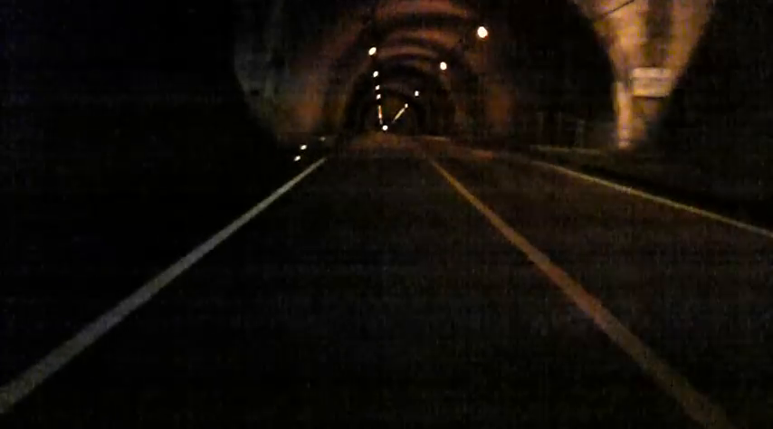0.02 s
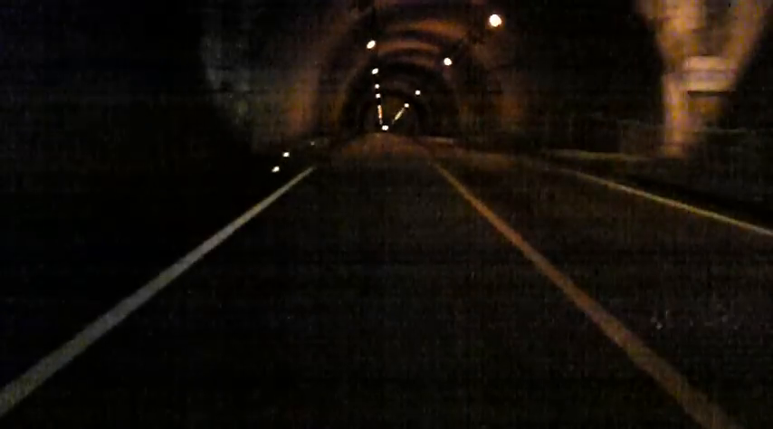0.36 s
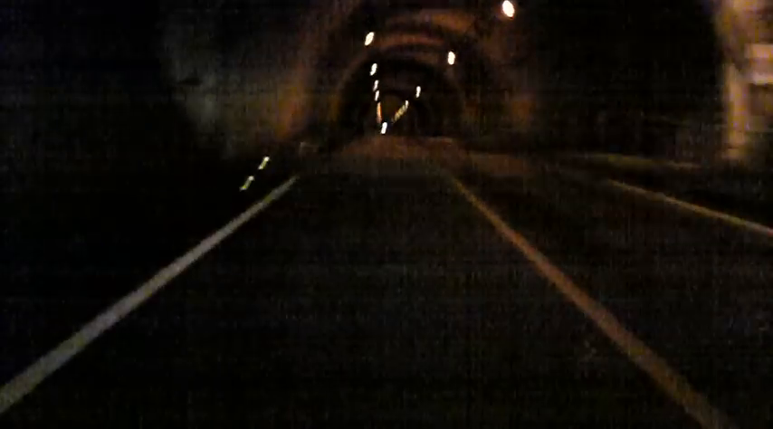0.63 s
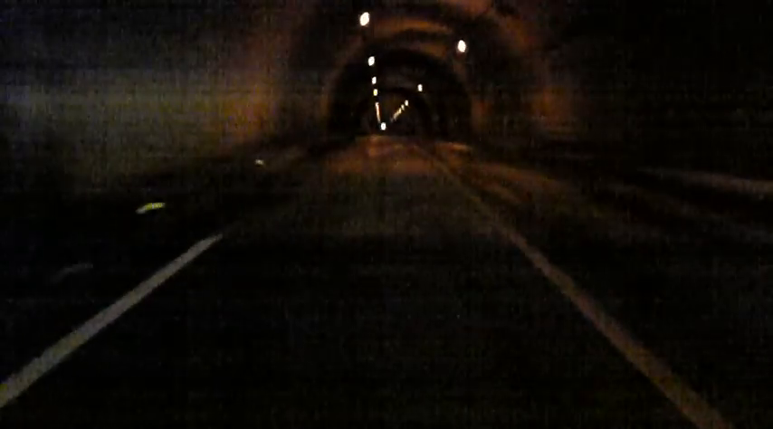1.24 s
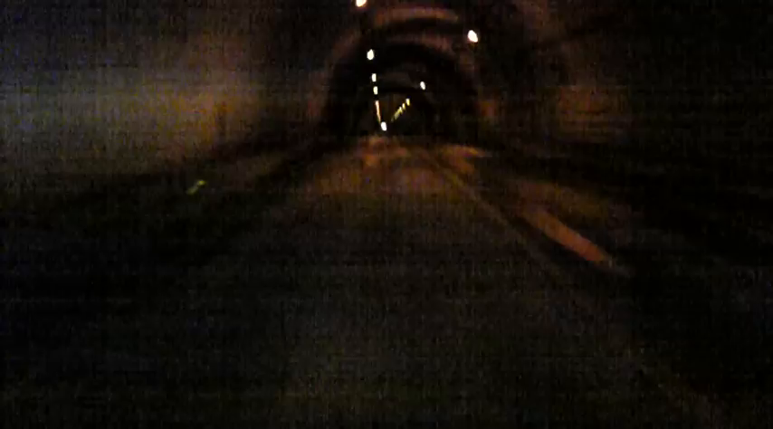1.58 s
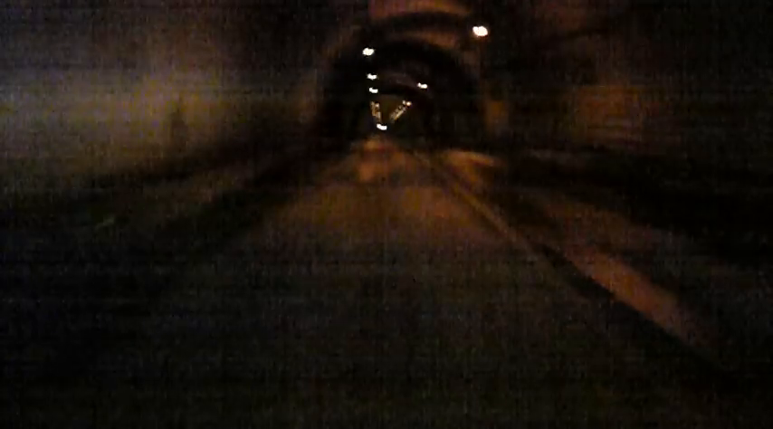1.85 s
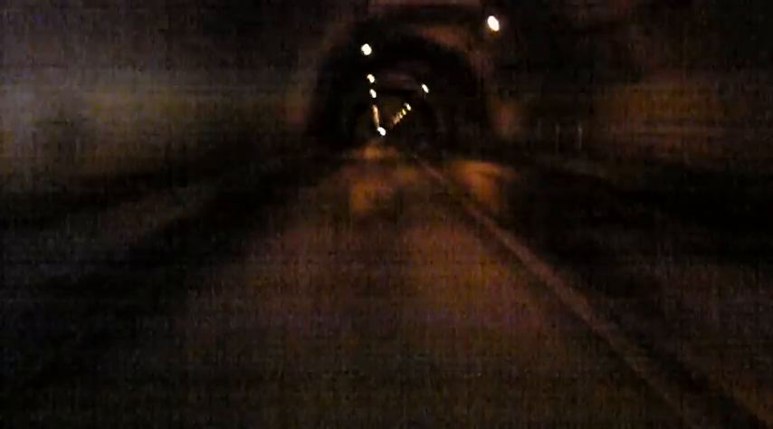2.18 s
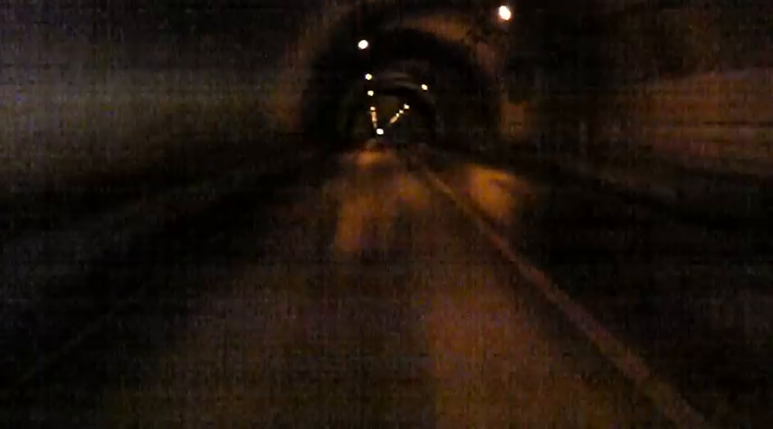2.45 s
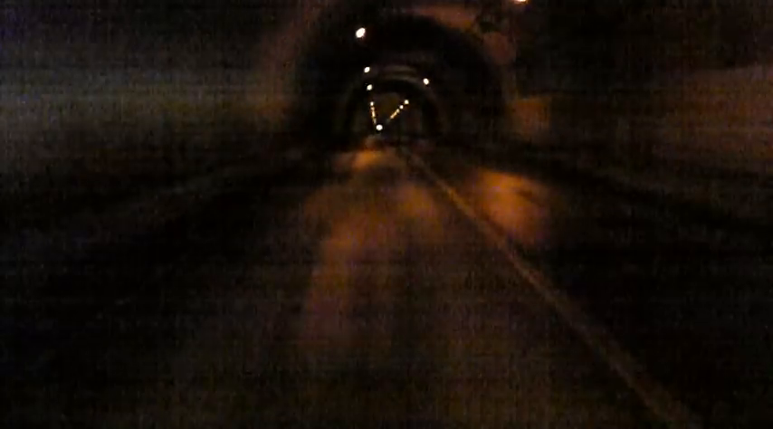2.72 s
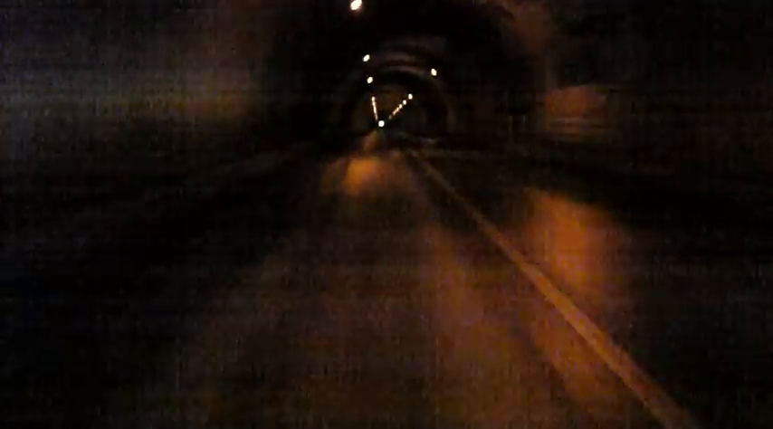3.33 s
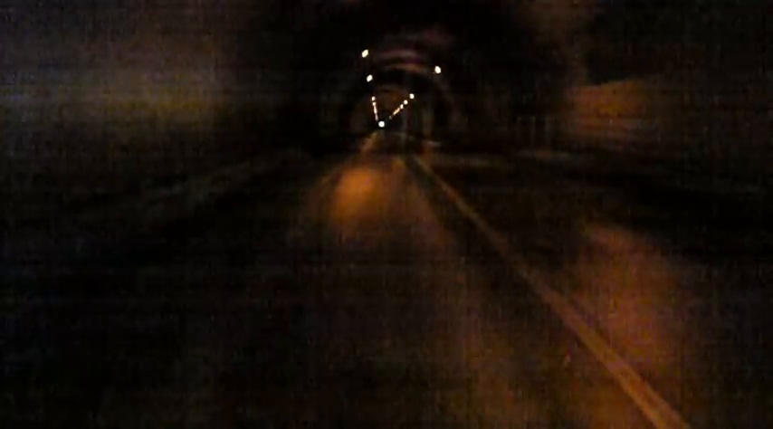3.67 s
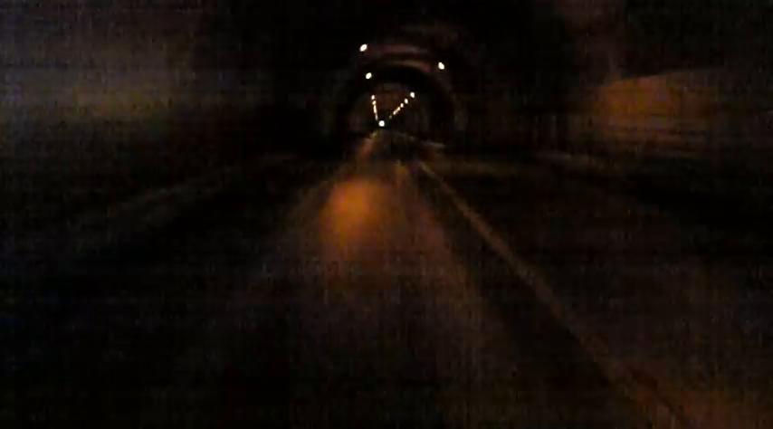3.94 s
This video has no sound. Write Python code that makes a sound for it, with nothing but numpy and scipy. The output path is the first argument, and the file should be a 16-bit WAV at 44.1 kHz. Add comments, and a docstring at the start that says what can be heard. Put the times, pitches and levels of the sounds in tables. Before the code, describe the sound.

A loud train-style air horn holds one note as a car drives into a tunnel.

```python
"""A train-style air horn on a car holds one note as the car drives into a road tunnel.
Engine and tyre drone come first; compressed air rushes out, a shrill edge-tone whistle speaks, and
the horn's diaphragm joins in and sounds to the end. Inside, the tunnel roars and wall reflections
make the partials swell, fade and beat. A narrow-band recorder with gain control ducks the road
under the horn. Faint, very short high ticks sound at set times."""
import sys
import numpy as np
from scipy import signal
from scipy.fft import rfft, irfft
from scipy.io import wavfile
from scipy.ndimage import uniform_filter1d, minimum_filter1d

SR = 44100
rng = np.random.default_rng(int(sys.argv[2]) if len(sys.argv) > 2 else 0)


def store_pcm(level_fs):
    """Save levels as 16-bit WAV."""
    pcm = np.round(np.clip(level_fs, -1, 1) * 32767).astype(np.int16)
    wavfile.write(sys.argv[1], SR, np.atleast_2d(pcm).T)


N = 176400
T = np.arange(N) / SR
HORN_HZ = 310.6


def amp(db):
    """Decibels to gain."""
    return 10 ** (np.asarray(db) / 20)


def unit(x):
    """Scales to rms 1."""
    return x / np.sqrt(np.mean(abs(x) ** 2) + 1e-20)


def curve(rows, column=1):
    """An automation curve: one column of a time table, at every sample."""
    rows = np.array(rows)
    return np.interp(T, rows[:, 0], rows[:, column])


def noise(spectrum):
    """Noise of rms 1, coloured by rows of f/Hz, level/dB."""
    hz, db = np.transpose(spectrum)
    f = np.fft.rfftfreq(N, 1 / SR)
    colour = amp(np.interp(np.log(f + 1), np.log(hz), db))
    return unit(irfft(rfft(rng.standard_normal(N)) * colour, N))


def flutter(width_hz, order=4):
    """Complex random modulation of rms 1, up to about the given rate."""
    f = np.fft.fftfreq(N // 20, 20 / SR)
    phases = np.exp(2j * np.pi * rng.random(len(f)))
    motion = np.fft.ifft(phases / np.sqrt(1 + abs(f / width_hz) ** order))
    return unit(np.interp(T, T[::20], motion))


def tone(hz):
    """A complex oscillator that follows a pitch curve; its real part has rms 1."""
    return np.sqrt(2) * np.exp(2j * np.pi * (np.cumsum(hz * np.ones(N)) / SR + rng.random()))


def low_pass(x, hz):
    """Steep low-pass."""
    return signal.fftconvolve(x, signal.firwin(401, hz, window=("kaiser", 10), fs=SR), "same")


def road():
    """Wavering engine and tyre tones in a bed of flickering road noise."""
    # engine and tyre tones: f/Hz, level/dB
    drone_tones = [(152, -16), (204, -10.5), (255, -13.5), (305, -6), (348, -1), (382, -12), (533, -18),
                   (636, -18.5), (687, -16)]
    # road noise spectrum: f/Hz, level/dB
    road_colour = [(20, -42), (60, -26), (120, -17), (210, -3), (360, 3), (480, -10.5), (800, -12.5),
                   (1200, -19.5), (2000, -25), (2800, -29), (3200, -27), (3500, -42), (4000, -54.5)]
    # fader for both, with an abrupt drop at 0.5 s: t/s, level/dB
    road_fader = [(0, -43), (.06, -35), (.22, -24.5), (.497, -20.5), (.503, -42), (.53, -32), (.68, -32.5),
                  (1, -42), (4, -42.5)]
    drone = sum(amp(db) * (tone(hz) * (1 + .5 * flutter(width_hz=9))).real for hz, db in drone_tones)
    flicker = amp(1.4 * flutter(width_hz=25).real)
    bed = flicker * noise(road_colour)
    return (amp(-3.5) * drone + amp(-4.5) * bed) * amp(curve(road_fader))


def tunnel_roar():
    """The low roar that the tunnel walls return, building as the car goes in."""
    # roar spectrum: f/Hz, level/dB
    roar_colour = [(20, -20), (65, 0), (130, -1.5), (300, 5), (600, 2.5), (780, -8.5), (1200, -8.5),
                   (1600, -9), (2000, -15), (3000, -22.5), (4000, -41.5)]
    # roar build-up: t/s, level/dB
    roar_fader = [(0, -52), (.7, -42.5), (1, -37), (2, -36.5), (2.25, -30.5), (4, -30)]
    return noise(roar_colour) * amp(curve(roar_fader))


def air_rush():
    """Compressed air rushes out, coloured by the resonances of the horn's pipe."""
    # air spectrum: f/Hz, level/dB
    air_colour = [(300, -25), (800, -4), (1300, -0.5), (1900, -4.5), (2500, 0.5), (2900, -6.5), (3150, -5),
                  (3500, -18), (4000, -33.5)]
    # air onset and swell: t/s, level/dB
    air_fader = [(.62, -73), (.68, -42.5), (.82, -47.5), (.92, -37), (2.1, -33.5), (2.7, -30.5), (4, -28.5)]
    rush = noise(air_colour)
    pipe_echo = 0.38 * np.roll(rush, round(SR / HORN_HZ))  # one horn period late
    return unit(rush + pipe_echo) * amp(curve(air_fader))


def whistle(depth):
    """Two edge tones scoop up as the valve opens; the upper one stays, airy and smeared by the tunnel."""
    # upper edge tone: t/s, f/Hz, level/dB
    upper_line = [(.65, 2350, -54), (.685, 2388, -26.5), (.71, 2415, -31.5), (.74, 2430, -20.5),
                  (.77, 2423, -30.5), (.84, 2406, -29.5), (.9, 2432, -33), (1.6, 2422, -41),
                  (2.1, 2440, -33), (2.35, 2398, -25), (3.2, 2415, -33.5), (3.42, 2407, -25.5),
                  (3.8, 2385, -18.5), (4, 2395, -35.5)]
    # short-lived lower edge tone: t/s, level/dB
    lower_fader = [(.672, -26), (.695, -22.5), (.725, -29), (.8, -24), (.92, -23), (.98, -35), (1.1, -70)]
    lower_hz, scoop_hz, scoop_s, rise_s = 1554, 46.33, .03, 0.033
    breath_hz = 2503
    age = np.maximum(T - upper_line[0][0], 0)
    smear = np.clip(0.13 + 0.65 * depth, 0, 1)
    upper = tone(curve(upper_line)) * (np.sqrt(1 - smear ** 2) + smear * flutter(width_hz=14))
    upper += amp(-9) * tone(breath_hz) * flutter(width_hz=30)
    upper *= amp(curve(upper_line, column=2))
    lower = tone(lower_hz - scoop_hz * np.exp(-age / scoop_s)) * (1 + 0.22 * flutter(width_hz=86))
    lower *= np.minimum(age / rise_s, 1) ** 4 * amp(curve(lower_fader))
    return (age > 0) * (upper + lower).real


def horn(depth):
    """A diaphragm horn: upper partials bloom late; each has Doppler-shifted echoes and turbulence."""
    # harmonics at the tunnel mouth: nominal f/Hz, level/dB
    portal = [(311, -10), (621, -34.5), (932, -25), (1242, -19.5), (1553, -14.5), (1864, -38.5),
              (2174, -36.5), (2485, -39.5), (2795, -40), (3106, -37), (3417, -60.5), (3727, -67.5)]
    # the same harmonics deep inside: nominal f/Hz, level/dB
    inside = [(311, -12.5), (621, -16), (932, -24), (1242, -24), (1553, -22), (1864, -29), (2174, -30.5),
              (2485, -30.5), (2795, -35.5), (3106, -39.5), (3417, -50.5), (3727, -62)]
    # swells and fades in the tunnel's standing waves, by harmonic number: t/s, level/dB
    swells = {1: [(.89, -3), (.96, -3), (2.2, -2.5), (2.3, -6.5), (2.43, 3), (2.61, -4.5), (2.72, 0.5),
              (2.79, -1), (3.0, -1), (3.08, -4), (3.17, -4.5), (3.28, -2), (3.35, -2), (3.42, -11),
              (3.49, 2.5), (3.62, -2.5), (3.71, -6), (3.79, 0), (3.86, -7), (3.92, 4.5), (4, -11)],
              2: [(.9, 3), (1.08, -4), (1.21, -5.5), (1.28, 1), (1.72, -10), (1.88, 1.5), (2.0, -7),
              (2.14, 12), (2.4, 3.5), (2.6, -3.5), (3.0, -1.5), (3.52, 1.5), (3.72, -10), (4, -1.5)],
              3: [(.9, 0), (1.2, -4), (1.9, -5.5), (2.12, 1), (2.28, -11.5), (3.0, -13.5), (3.15, 1),
              (3.34, -3.5), (3.65, 3.5), (4, -3.5)], 4: [(1, -6), (2.25, -3.5), (2.6, 6.5), (2.85, -2),
              (2.94, -5), (3.05, 2), (3.35, 3.5), (3.5, 1), (3.84, 1), (3.92, -11.5)], 5: [(2.12, -10.5),
              (2.2, 0), (2.37, -1), (2.46, -15.5), (2.66, 5.5), (2.83, -4), (2.96, 7), (3.08, -6.5),
              (3.2, 1.5), (3.5, -0.5), (3.57, -2), (3.63, 2.5), (3.9, -8.5), (4, 8)]}
    start_s, rise_s, bloom_s = .764, 0.085, 0.072
    sharp_hz, settle_s, waver_hz, jitter_hz = 8, .135, 0.26, 1.17
    echo_portal, echo_inside, doppler_hz, wobble_hz = 0.057, 0.16, 11.1, 1.8
    age = np.maximum(T - start_s, 0)
    hz = HORN_HZ + sharp_hz * np.exp(-(age / settle_s) ** 4)  # starts sharp, then settles
    hz += waver_hz * flutter(width_hz=5.2).real + jitter_hz * flutter(width_hz=80).real
    wobble_rate_hz = 5 + flutter(width_hz=0.99).real
    wobble = wobble_hz * depth * np.sin(2 * np.pi * np.cumsum(wobble_rate_hz) / SR)
    blast = np.zeros(N)
    for k, ((_, portal_db), (_, inside_db)) in enumerate(zip(portal, inside), 1):
        swell_db = curve(swells[k]) if k in swells else 0
        level = amp(portal_db + (inside_db - portal_db) * depth + swell_db)
        attack = np.clip((age - bloom_s * (1 - 1 / k)) / rise_s, 0, 1) ** 2
        echo = (echo_portal + (echo_inside - echo_portal) * depth) * k ** 0.76
        paths = (1 + echo * flutter(doppler_hz, order=8)) / np.sqrt(1 + echo ** 2)
        # a noisy skirt round each partial, stronger higher up and deeper in
        turbulence = amp(-25.5 + 14.5 * np.log10(k) + 3.5 * depth) * flutter(width_hz=51)
        blast += level * attack * (tone(k * hz + wobble) * (paths + turbulence)).real
    return blast


def ticks():
    """Faint, very short high ticks at set times."""
    # tick cues: t/s, level/dB
    cues = [(.893, -25), (.896, -22), (0.902, -31), (.909, -27), (2.156, -32), (2.233, -20.5),
            (2.236, -21.5), (2.274, -23), (2.673, -24), (2.726, -19), (2.729, -18.5), (2.736, -18),
            (2.742, -20), (2.821, -25), (2.927, -30.5), (3.213, -26), (3.431, -18), (3.455, -20.5),
            (3.504, -16), (3.791, -17)]
    width_s = .00005
    snaps = np.zeros(N)
    for at_s, db in cues:
        distance_s = abs(T - round(at_s * SR) / SR)
        snaps += amp(db) * np.exp(-np.minimum(distance_s / width_s, 30))
    return snaps


def gain_control(x):
    """Lifts quiet sound, ducks quickly when it gets loud and recovers slowly."""
    max_gain_db, target_db, squeeze = 19.5, -9, 0.54
    sense_s, recover_db_per_s = 0.06, 6
    level_db = 10 * np.log10(abs(uniform_filter1d(x ** 2, int(sense_s * SR))) + 1e-12)
    fall_db = T * recover_db_per_s
    held_db = np.maximum.accumulate(level_db + fall_db) - fall_db
    gain_db = np.minimum(squeeze * (target_db - held_db), max_gain_db)
    return x * amp(uniform_filter1d(gain_db, size=300))


def limiter(x, ceiling=.72):
    """A quick peak limiter holds the highest crests down."""
    gain = minimum_filter1d(np.minimum(ceiling / (abs(x) + 1e-9), 1), size=500)
    return x * uniform_filter1d(gain, size=500)


def scene():
    """Horn, whistle, air, road and tunnel roar, mixed at one microphone."""
    # how far the tunnel encloses the car: t/s, share/0-1
    enclosure = [(0, 0), (1.0, 0.21), (2.0, 0.14), (2.3, 0.67), (2.8, 0.98), (4, 0.97)]
    depth = np.clip(curve(enclosure), 0, 1)
    return (horn(depth) + whistle(depth) + air_rush() + road() + tunnel_roar())[None]


def record(dry):
    """The recorder levels the mix and narrows its band; the ticks reach above that band."""
    narrow = low_pass(limiter(gain_control(dry[0])), hz=4200)
    return low_pass(narrow + ticks(), hz=15800)[None]


dry = scene()
out = record(dry)
store_pcm(out)
```